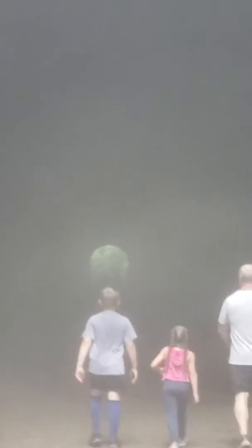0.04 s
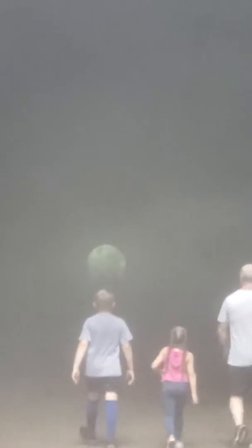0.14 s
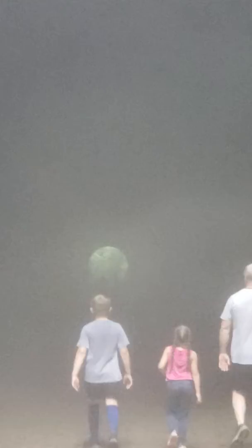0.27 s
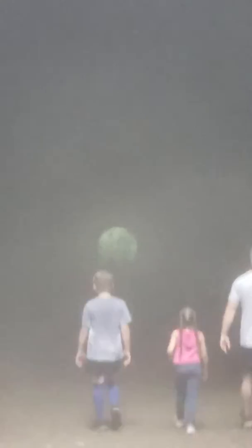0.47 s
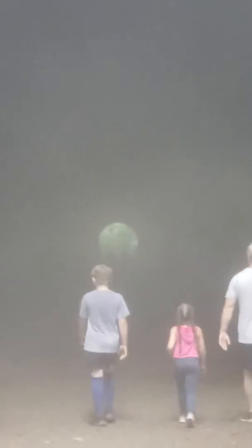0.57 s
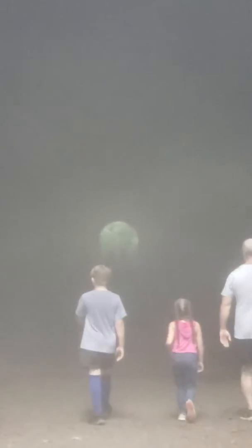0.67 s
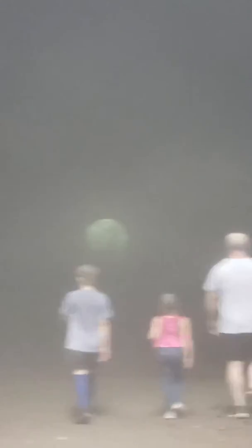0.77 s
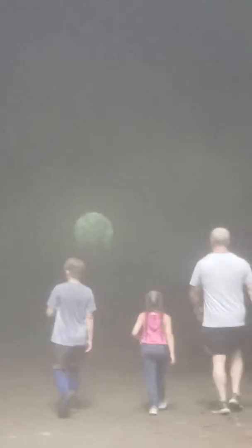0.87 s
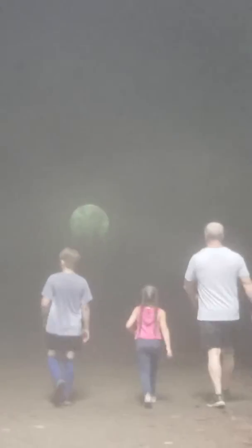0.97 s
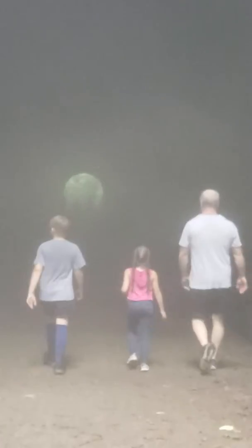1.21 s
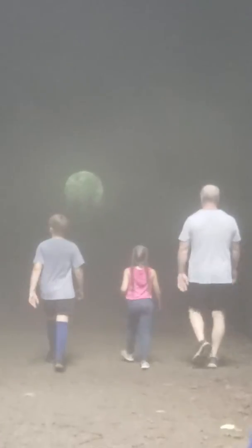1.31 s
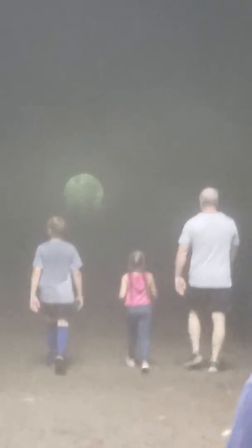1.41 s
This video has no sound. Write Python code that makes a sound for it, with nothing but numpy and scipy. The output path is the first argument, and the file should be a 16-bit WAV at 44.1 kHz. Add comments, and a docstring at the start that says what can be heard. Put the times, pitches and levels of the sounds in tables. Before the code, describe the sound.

Soft footsteps scuff and crunch on damp dirt and fine gravel, close by, at about 0.1, 0.6 and 1.2 seconds, with a short tunnel echo over steady hiss. Wind rumbles on the microphone, thumping hardest on the right around 0.25 and 0.45 seconds, with lighter puffs near 0.7 to 0.8. Small pebbles grind and clink underfoot, mostly from 1.2 to 1.4 seconds.

```python
"""Soft steps in a tunnel

Damp dirt and fine gravel in a wide tunnel, close to the stereo microphone of a hand-held camera.
Each step is a gritty scuff and a duller crunch as the sole rolls; a few pebbles grind and clink over
a steady hiss. Moving air buffets the two microphone ports separately, and the right port is muffled."""
import numpy as np
from scipy import signal
from scipy.fft import rfft, irfft
from scipy.ndimage import uniform_filter1d
import sys
import numpy as np
from scipy import signal
from scipy.fft import rfft, irfft
from scipy.io import wavfile
from scipy.ndimage import uniform_filter1d

SR = 44100
rng = np.random.default_rng(int(sys.argv[2]) if len(sys.argv) > 2 else 0)


def master_out(mix):
    """Clip the mix to full scale and print it as 16-bit PCM to the path in sys.argv[1]."""
    frames = np.transpose(np.atleast_2d(mix))
    ceiling = np.clip(frames, -1, 1)
    pcm = np.round(ceiling * 32767).astype(np.int16)
    wavfile.write(sys.argv[1], SR, pcm)


N = 63945
T = np.arange(N) / SR


def amp(db):
    """Decibels to gain."""
    return 10 ** (np.asarray(db) / 20)


def unit_rms(x):
    """Scales to rms 1."""
    return x / np.sqrt(np.mean(x ** 2) + 1e-20)


def colour(x, points):
    """Equalises along a curve of (f/Hz, gain/dB) points."""
    hz, db = np.transpose(points)
    size = 2 * N
    bins_hz = np.fft.rfftfreq(size, 1 / SR)
    gain = amp(np.interp(np.log(bins_hz + 1), np.log(hz), db))
    return irfft(rfft(x, size) * gain, size)[..., :N]


def envelope(start, rise, hold, fade):
    """Straight rise, hold, exponential fade; all in seconds."""
    return np.clip((T - start) / rise, 0, 1) * np.exp(-np.maximum(T - start - rise - hold, 0) / fade)


def grains(per_s, spread_db, friction, shared, port_delay_s=0.00032):
    """Tiny uneven fractures over friction noise; the part both ports share reaches the left one later."""
    size = amp(spread_db * np.minimum(rng.exponential(1, (3, N)), 4))
    clicks = unit_rms(size * rng.choice([-1., 1.], (3, N)) * (rng.random((3, N)) < per_s / SR))
    left, right, common = clicks + friction * rng.standard_normal((3, N))
    late = np.roll(common, round(port_delay_s * SR))
    return np.array([left + shared * late, right + shared * common])


def hiss(left_db=-55.5, right_db=-59.5):
    """Room tone: the steady hiss of the tunnel."""
    # hiss spectrum: f/Hz, level/dB
    spectrum = [(200, -1.5), (400, -6), (900, -4), (1600, 0), (2800, 0), (7400, -1.5), (16000, -7.5)]
    return amp([[left_db], [right_db]]) * unit_rms(colour(rng.standard_normal((2, N)), spectrum))


def wind(bass_cut_hz=51.7, collapse_ratio=0.49):
    """Air on the ports: rumble, gusts, and puffs that swell, collapse and ring in the bass cut."""
    # spectra of the rumble and of the gusts: f/Hz, level/dB
    rumble_spectrum = [(20, -28), (60, -3), (90, -9.5), (140, -26), (250, -28), (500, -42), (3000, -71)]
    gust_spectrum = [(40, 6.5), (90, 4.5), (250, -1), (430, -10.5), (820, -13.5), (1400, -25),
                     (3000, -31.5), (5000, -46), (16000, -65)]
    # rumble on each port, ahead of the bass cut: t/s, level/dB
    rumble_left = [(0, -64), (.12, -46), (.2, -86), (.41, -69), (.48, -51.5), (.64, -44.5), (.8, -50),
                   (.92, -53), (.98, -70), (1.14, -68), (1.19, -49.5), (1.28, -64), (1.45, -76)]
    rumble_right = [(0, -42.5), (0.037, -40.5), (.09, -48), (.16, -43.5), (.2, -47.5), (.32, -46.5),
                    (0.379, -41.5), (0.488, -42), (.56, -49), (.66, -50), (.76, -43), (.85, -45.5),
                    (.98, -52.5), (1.14, -56.5), (1.19, -47), (1.45, -48.5)]
    # turbulent gusts on the right port: t/s, rise/s, hold/s, level/dB, low-pass f/Hz
    gusts = [(0.212, 0.02, 0.038, -30.5, 6250), (.425, 0.00535, 0.00673, -31.5, 494)]
    # single puffs: t/s, port (0 left, 1 right), level/dB, swell/s
    puffs = [(0.04, 0, -30.5, 0.0048), (.536, 0, -39.5, 0.0014), (0.688, 0, -21.5, 0.0039),
             (0.734, 0, -25.5, 0.0029), (0.783, 0, -25, 0.0029), (.811, 0, -33.5, 0.0024),
             (1.207, 0, -23.5, 0.0082), (0.164, 1, -36.5, 0.0012), (.262, 1, -8.5, 0.0042),
             (.357, 1, -20.5, 0.0042), (.384, 1, -31.5, .0018), (0.4335, 1, -7.5, .0026),
             (0.749, 1, -30, 0.0028), (.813, 1, -19.5, 0.0044), (1.009, 1, -26, 0.0028),
             (1.08, 1, -29.5, 0.0021), (1.221, 1, -33.5, 0.0011)]
    air = colour(rng.standard_normal((2, N)), rumble_spectrum)
    air /= np.sqrt(uniform_filter1d(air ** 2, 2205, axis=1) + 1e-20)  # even out over 50 ms
    air *= amp([np.interp(T, *np.transpose(curve)) for curve in (rumble_left, rumble_right)])
    eddies = unit_rms(colour(rng.standard_normal(N), gust_spectrum))
    for start, rise, hold, db, top_hz in gusts:
        gust = signal.sosfilt(signal.butter(4, top_hz, fs=SR, output="sos"), eddies)
        air[1] += amp(db) * envelope(start, rise, hold, fade=0.0013) * gust
    for start, port, db, swell in puffs:
        age = np.clip((T - start) / swell, -40, 40)
        air[int(port)] += amp(db) * 2 / (np.exp(-age) + np.exp(age / collapse_ratio))
    bass_cut = signal.cheby1(4, 0.5, bass_cut_hz, btype="high", fs=SR, output="sos")
    return signal.sosfilt(bass_cut, air)


def scuffs(sand_db=-44):
    """Soles brush loose grit; the spray of fine sand grows with the square of the rubbing."""
    # shoe strokes: t/s, rise/s, fade/s, level/dB
    strokes = [(0.046, 0.0095, 0.02, -51.5), (.09, 0.14, 0.07, -49.5), (0.354, 0.0086, 0.056, -52),
               (0.446, 0.017, 0.13, -50), (0.523, 0.02, 0.11, -47), (.62, 0.034, 0.045, -52.5),
               (0.743, 0.016, 0.28, -55), (0.92, 0.018, 0.028, -50.5), (1.062, 0.005, 0.014, -53),
               (1.152, 0.049, 0.22, -49.5), (1.295, 0.0075, 0.17, -54)]
    # spectra of grit and sand: f/Hz, level/dB
    grit_spectrum = [(300, -11), (700, -12), (1300, -5.5), (2200, 1.5), (3800, 0.5), (5500, -1.5),
                     (7500, -6.5), (16000, -13.5)]
    sand_spectrum = [(2000, -24), (6000, -6.5), (11000, -6), (16000, -8)]
    rub = np.sqrt(sum((amp(db) * envelope(start, rise, 0, fade)) ** 2
                      for start, rise, fade, db in strokes))
    sand = unit_rms(colour(rng.standard_normal((2, N)), sand_spectrum))
    grit = unit_rms(colour(grains(per_s=3500, spread_db=4.5, friction=0.91, shared=0.24), grit_spectrum))
    return rub * grit + amp(sand_db) * (rub / rub.max()) ** 2 * sand


def crunches():
    """Damp dirt gives way under the weight of each step."""
    # rolls of the sole: t/s, hold/s, level/dB
    steps = [(0.065, 0.12, -50), (0.609, 0.066, -48), (0.719, 0.065, -47), (1.223, 0.15, -51),
             (1.265, 0.15, -49.5)]
    # spectrum of crushed dirt: f/Hz, level/dB
    spectrum = [(100, -20), (210, -3), (320, -5), (500, -0.5), (800, 0), (1200, -0.5), (2000, -1),
                (3500, -8), (7000, -13), (16000, -11)]
    weight = np.sqrt(sum((amp(db) * envelope(start, rise=0.022, hold=hold, fade=0.032)) ** 2
                         for start, hold, db in steps))
    dirt = grains(per_s=3000, spread_db=3.5, friction=0.6, shared=1.0)
    return weight * unit_rms(colour(dirt, spectrum))


def tunnel(x, level_db=-8.5, t60_s=0.47, predelay_s=0.012):
    """The rock walls return a diffuse tail with a few hollow resonances."""
    wall_hz = [513, 571, 768, 835]
    t = T[:SR // 2]
    hollow = amp(-32) * sum(np.sin(2 * np.pi * (hz * t + rng.random((2, 1)))) for hz in wall_hz)
    tail = (rng.standard_normal((2, len(t))) + hollow) * amp(-60 * t / t60_s) * (t > predelay_s)
    return amp(level_db) * signal.fftconvolve(x, tail / np.linalg.norm(tail[0]), axes=1)[:, :N]


def clinks(fade_s=0.0042):
    """A loose stone is knocked and rings on one note."""
    # knocked stones: t/s, level/dB, f/Hz
    knocks = [(0.303, -49, 2840), (1.385, -40, 2580)]
    return sum(amp(db) * envelope(start, 1 / hz, 0, fade_s) * np.sin(2 * np.pi * hz * (T - start))
               for start, db, hz in knocks)


def pebbles(band_ratio=1.24):
    """Each stone grinds briefly on its neighbours: one band of crackle, higher for a smaller stone."""
    # pebbles under a sole: t/s, level/dB, centre f/Hz, fade/s
    stones = [(.373, -50.5, 3180, 0.016), (.4644, -41.5, 5600, 0.0021), (.686, -38, 2640, .002),
              (.935, -45.5, 4560, 0.0059), (1.0615, -42, 3740, 0.0011), (1.2075, -38, 4600, 0.0018),
              (1.234, -41, 5000, 0.0013), (1.3003, -33, 2710, .001), (1.304, -33.5, 2700, 0.00079),
              (1.311, -37.5, 3050, 0.0039), (1.320, -38.5, 2460, 0.0013)]
    out = np.zeros((2, N))
    for start, db, hz, fade in stones:
        band = signal.butter(2, [hz / band_ratio, hz * band_ratio], "band", fs=SR, output="sos")
        grind = unit_rms(signal.sosfilt(band, rng.standard_normal((2, N))))
        out += amp(db) * envelope(start, 1 / SR, 0, fade) * grind
    return out


def scene():
    """Close footsteps, their tail and the hiss reach both ports; wind acts on the ports themselves."""
    # response of the muffled right port: f/Hz, gain/dB
    muffle = [(60, 8), (270, -6), (500, -2.5), (1200, -5), (2000, -13), (3900, -14.5), (4900, -26),
              (5700, -21), (7500, -34.5), (8900, -19), (10000, -9), (11300, -11), (11900, -21),
              (16000, -23)]
    feet = crunches() + scuffs() + pebbles() + clinks()
    left, right = feet + hiss() + tunnel(feet)
    return np.array([left, colour(right, muffle)]) + wind()


def record(dry, top_hz=15900):
    """The microphone colours both channels, and a steep low-pass limits the band."""
    # microphone response: f/Hz, gain/dB
    response = [(20, 0), (6300, 0.5), (7400, 5), (8300, -7), (12000, -2.5), (16000, -4)]
    low_pass = signal.firwin(511, top_hz, window=("kaiser", 9), fs=SR)
    return signal.oaconvolve(colour(dry, response), low_pass[None], "same")


dry = scene()
out = record(dry)
master_out(out)
```